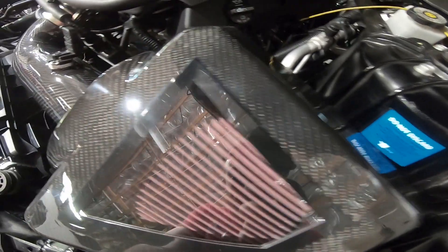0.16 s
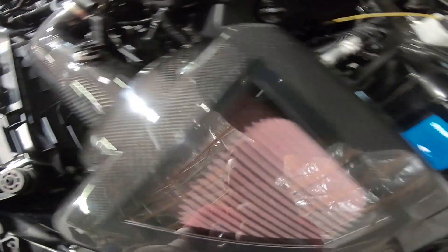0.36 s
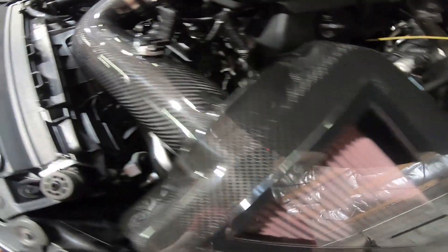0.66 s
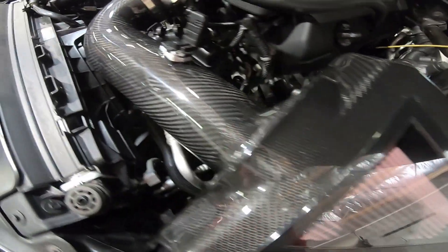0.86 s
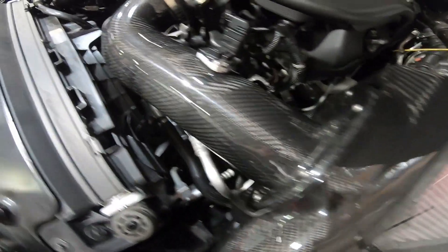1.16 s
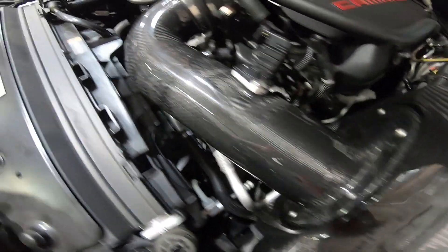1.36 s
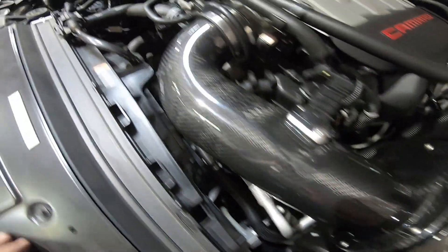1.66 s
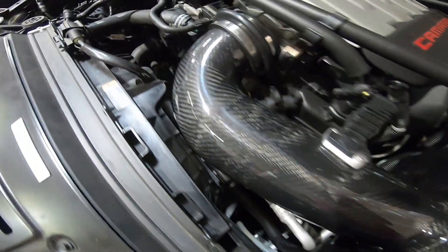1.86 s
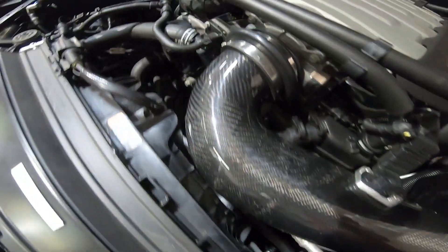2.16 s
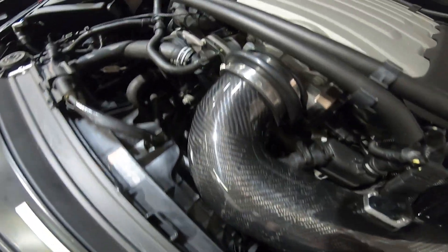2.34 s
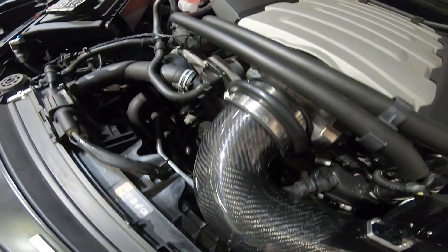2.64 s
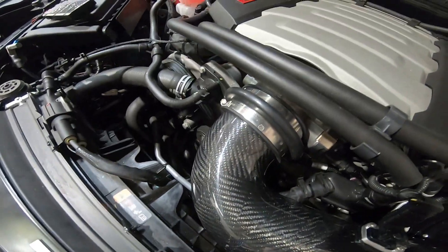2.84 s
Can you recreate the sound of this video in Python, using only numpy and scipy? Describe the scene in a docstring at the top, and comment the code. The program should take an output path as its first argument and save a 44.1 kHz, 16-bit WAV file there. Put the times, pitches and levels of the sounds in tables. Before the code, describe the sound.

A large V8 idles evenly in a garage, deep throbbing pulses over a low hum, with intake air rushing, belt whirr and rapid injector ticks, heard close as the microphone drifts from air filter towards the block.

```python
"""The throb of a big V8 idling at about 600 rpm in a garage, heard from just above the open engine bay.
Pulses at the firing rate make the beat, over a steady sine hum; noise shaped by resonances drones in the
block and rings in the intake. Bursts of noise are the injector ticks, and soft notes chirp once per engine cycle.
The microphone drifts from the rushing air filter towards the block and the whirring belt drive."""
import sys
import numpy as np
from scipy import signal
from scipy.fft import rfft, irfft
from scipy.io import wavfile
from scipy.ndimage import uniform_filter1d, minimum_filter1d

SR = 44100
rng = np.random.default_rng(int(sys.argv[2]) if len(sys.argv) > 2 else 0)


def log_audio(samples):
    """Write samples as a 16-bit WAV file to the path given in sys.argv[1]."""
    # one column per channel
    frames = np.atleast_2d(samples).T
    # limit to full scale, then quantise
    limited = np.clip(frames, -1, 1)
    pcm = np.round(limited * 32767).astype(np.int16)
    wavfile.write(sys.argv[1], SR, pcm)


N = 132300
T = np.arange(N) / SR
HZ = np.fft.rfftfreq(N, 1 / SR)
CYLINDERS = 8

# left-right likeness of belt drive and ticks: (frequency [Hz], likeness [0-1])
CLATTER_SAME = [(300, 0.47), (600, 1), (900, 0.55), (1300, 1), (3300, 0.52), (4200, 0.75), (5700, 0.28),
                (7000, 0.92), (15000, 1)]
# balance of belt drive, scaled for the ticks: (time [s], left minus right [dB])
CLATTER_PAN = [(0, 2), (1.2, 0.1), (2.3, -2.1), (3, -1.5)]


def amp(db):
    """Amplitude ratio from dB."""
    return 10 ** (np.asarray(db) / 20)


def unit(x):
    """Scales to an RMS of 1."""
    return x / np.sqrt(np.mean(x ** 2) + 1e-20)


def curve(points):
    """Breakpoints in time to one value per sample."""
    return np.interp(T, *np.transpose(points))


def spectrum(points):
    """Breakpoints in frequency to one value per bin, on a log axis."""
    f, value = np.transpose(points)
    return np.interp(np.log(HZ + 1), np.log(f + 1), value)


def wander(rate_hz):
    """Slow random drift of RMS 1: low-passed noise without its mean."""
    lowpass = np.exp(-(HZ / rate_hz) ** 2) * (HZ > 0)
    return unit(irfft(rfft(rng.standard_normal(N)) * lowpass, N))


def pan(left_db):
    """Left and right gains; left_db is left minus right."""
    return amp(np.array([[1], [-1]]) * left_db / 2)


def colour(pair, gain, same):
    """Filters two noises into a left-right pair of given likeness, RMS 1."""
    a, b = rfft(pair)
    same = np.clip(same, -1, 1)
    right = same * a + np.sqrt(1 - same ** 2) * b
    return unit(irfft(np.array([a, right]) * gain, N))


def churn(firings, repeat):
    """Two noises, of which a power share comes back alike in every engine cycle."""
    size = SR // 5
    place = (firings / CYLINDERS % 1 * size).astype(int) % size
    repeat = np.clip(repeat, 0, 1)
    alike = rng.standard_normal((2, size))[:, place]
    fresh = rng.standard_normal((2, N))
    return np.sqrt(repeat) * alike + np.sqrt(1 - repeat) * fresh


def resonances(modes):
    """Joint gain of resonant peaks, each halved in amplitude one width off centre."""
    return np.sqrt(sum((amp(db) / (1 + ((HZ - hz) / width) ** 2)) ** 2 for hz, width, db in modes))


def ripple(width_hz):
    """Random peaks and dips along the spectrum, from many small resonances and reflections."""
    knots = np.arange(0, SR, max(width_hz, 5))
    return np.interp(HZ, knots, rng.standard_normal(SR // 4)[:len(knots)])


def cycle_note(firings, hz, place_s, half_s, level):
    """A short soft note at the same point of each engine cycle, slightly varied in pitch and level."""
    out = np.zeros(N)
    cycles = int(firings[-1] / CYLINDERS)
    for k, (detune, stray_db) in enumerate(rng.standard_normal((cycles, 2))):
        age = T - np.interp(k * CYLINDERS, firings, T) - place_s
        swell = np.exp(-.5 * (age / half_s) ** 2)
        out += amp(stray_db) * swell * np.sin(2 * np.pi * (hz + 4 * detune) * age)
    return out * amp(curve(level))


def crank_rpm():
    """Idle speed, drifting by a few rpm."""
    # (time [s], speed [rpm])
    speed = [(0, 596), (.8, 598.8), (1.1, 601.6), (1.7, 601.5), (2, 600.3), (2.3, 604), (3, 604.6)]
    return curve(speed)


def beat(firings):
    """Leaning pressure pulses, one per firing, over the rumble of uneven combustion."""
    # harmonics of the pulse: (multiple of the firing rate, level [dB])
    orders = [(1, -1.5), (2, -8), (4, -42), (5, -28.5), (6, -40)]
    # pulses: (time [s], level [dB])
    pulse_level = [(0, -14), (.15, -15.5), (.45, -16.5), (1.05, -16.5), (1.4, -16.5), (1.9, -15.5),
                   (2.25, -16.5), (2.8, -17.5), (3, -15)]
    # uneven combustion: (frequency [Hz], density [dB per Hz])
    rumble_tone = [(8, 11), (24, 1.5), (45, 4.5), (65, 10), (95, 10), (135, 8.5), (170, -1), (300, -50.5)]
    lean_turns, rumble_db = .13, -29.5
    turns = firings + 0.0043 * wander(rate_hz=2.3)
    pulses = np.zeros(N)
    for k, db in orders:
        k = round(k)
        phase = 2 * np.pi * (k * turns + (k - 1) * lean_turns)
        pulses += amp(db + 0.71 * wander(rate_hz=2.7)) * np.cos(phase)
    rumble = colour(churn(firings, repeat=0.36), amp(spectrum(rumble_tone)), same=0.92)
    return (np.sqrt(2) * amp(curve(pulse_level)) * pulses + amp(rumble_db) * rumble) * pan(left_db=-1.1)


def hum():
    """A steady sine hum that does not follow the crank."""
    hum_hz, hum_db = 119.97, -26.5
    level = np.sqrt(2) * amp(hum_db + 0.2 * wander(rate_hz=3.2))
    return -level * np.cos(2 * np.pi * hum_hz * T) * pan(left_db=-0.7)


def block(firings):
    """Combustion shakes the low resonances of the block and its covers."""
    # (centre [Hz], width [Hz], level [dB])
    modes = [(207.4, 22.4, -0.5), (244.6, 27, -6), (296.8, 22.3, -4)]
    # (time [s], level [dB])
    drone_level = [(0, -36.5), (.7, -37.5), (1.1, -36.5), (1.35, -35.5), (1.65, -32.5), (1.9, -29.5),
                   (2.1, -32), (2.3, -29), (2.47, -32), (2.62, -26.5), (2.75, -35.5), (3, -32.5)]
    shake = churn(firings, repeat=0.46) * (1 + 0.23 * np.cos(2 * np.pi * (firings - .4)))
    return amp(curve(drone_level)) * colour(shake, resonances(modes), same=0.98) * pan(left_db=-2.5)


def intake(firings):
    """Air is gulped through the filter, to the right, and rings in the duct and the pipe."""
    # rush: (frequency [Hz], density [dB per Hz])
    rush_tone = [(150, 0.5), (300, -10.5), (370, -1), (430, 1.5), (530, -2), (620, 0), (760, 2),
                 (900, -5.5), (1200, -34), (3000, -55)]
    # rush: (time [s], level [dB])
    rush_level = [(0, -39), (.15, -40.5), (.45, -40.5), (.7, -39), (1.1, -40.5), (1.6, -39.5), (2.3, -38),
                  (3, -39.5)]
    # duct: (centre [Hz], width [Hz], level [dB])
    duct_modes = [(503, 53, -1), (614, 46, -1), (1360, 110, -17.5), (1708, 49, -12)]
    # duct, near the filter: (time [s], level [dB])
    duct_level = [(0, -40.5), (.15, -41.5), (.4, -40), (.55, -45.5), (.8, -52), (1.3, -53.5), (3, -61)]
    # pipe: (centre [Hz], width [Hz], level [dB])
    pipe_modes = [(301.5, 18, 1), (360, 28, -5), (431, 17, -6)]
    # pipe, as the microphone passes over it: (time [s], level [dB])
    pipe_level = [(0, -46), (.6, -40), (1.1, -38.5), (1.7, -44), (3, -45)]
    gulps = churn(firings, repeat=0.17) * (1 + 0.22 * np.cos(2 * np.pi * firings))
    rush = amp(curve(rush_level)) * colour(gulps, amp(spectrum(rush_tone)), same=0.79)
    # one surge per engine cycle
    surges = churn(firings, repeat=0.24) * (1 + .5 * np.cos(2 * np.pi * (firings / CYLINDERS - .8)))
    duct = amp(curve(duct_level)) * colour(surges, resonances(duct_modes), same=0.88)
    flow = churn(firings, repeat=0.2)
    pipe = amp(curve(pipe_level)) * colour(flow, resonances(pipe_modes), same=0.97)
    return (rush + duct) * pan(left_db=-8.5) + pipe * pan(left_db=-4.0)


def whirr(firings):
    """Belt and valve gear: a dense, slightly grainy clatter that swells a little with each firing."""
    # (frequency [Hz], density [dB per Hz])
    tone = [(200, -12), (600, 0), (900, 3), (1200, 1), (1550, -2.5), (1850, -.5), (2300, -3), (2700, -6.5),
            (3200, -7), (3800, -12), (4700, -14), (6300, -12), (7600, -13), (9000, -24), (11500, -32),
            (16000, -43)]
    # (time [s], level before 4 dB of gain [dB])
    level = [(0, -49), (.4, -48.5), (1.2, -46.5), (2.2, -45), (3, -44.5)]
    ripple_db = 1.5
    grain_db = 1.03 * wander(rate_hz=120)
    swell_db = 0.18 * np.cos(2 * np.pi * (firings - .75))
    drive = churn(firings, repeat=0.28) * amp(grain_db + swell_db)
    gain = amp(spectrum(tone) + ripple_db * ripple(width_hz=45))
    sound = colour(drive, gain, spectrum(CLATTER_SAME))
    return amp(curve(level) + 4) * sound * pan(curve(CLATTER_PAN))


def injectors(firings):
    """Each injector ticks open and shut in its own colour; the engine bay smears the ticks."""
    # in firing order: (delay after the firing beat [s], relative level [dB])
    valves = [(.0135, -4), (.0135, .5), (.013, -1.5), (.0135, -.7), (.0145, 0), (.0128, -.5), (.015, 1),
              (.0125, 0)]
    # (frequency [Hz], density [dB per Hz])
    tick_tone = [(1000, -10), (2000, -12), (3000, -31), (4200, -19), (5200, 6), (6400, 9.5), (7700, 7.5),
                 (8800, -5.5), (10000, -6), (11200, -17), (13200, -19), (16000, -29)]
    # (time [s], level [dB])
    tick_level = [(0, -54), (1.2, -54), (2.2, -52), (3, -54.5)]
    jitter_s, stray_db, tint_db = .0005, 1.0, 2.5
    decay_s, bay_decay_s, close_s = .004, .024, .0095
    # opening, closing, bay: (delay [s], level [dB], amplitude decay [s])
    parts = ((0, 0, decay_s), (close_s, -1, decay_s), (0, -3.5, bay_decay_s))
    power = np.zeros((CYLINDERS, N))
    for k, (late, stray) in enumerate(rng.standard_normal((int(firings[-1]) + 1, 2))):
        valve = k % CYLINDERS
        age = T - np.interp(k, firings, T) - valves[valve][0] - jitter_s * late
        for after, level_db, decay in parts:
            start = np.searchsorted(age, after)
            part = slice(start, start + SR // 10)
            burst = np.exp(-2 * (age[part] - after) / decay)
            power[valve, part] += amp(level_db + stray_db * stray) ** 2 * burst
    tone, same = spectrum(tick_tone), spectrum(CLATTER_SAME)
    ticks = np.zeros((2, N))
    for own, (_, db) in zip(power, valves):
        noise = np.sqrt(own) * rng.standard_normal((2, N))
        ticks += amp(db) * colour(noise, amp(tone + tint_db * ripple(width_hz=468)), same)
    return amp(curve(tick_level)) * unit(ticks) * pan(0.48 * curve(CLATTER_PAN) + .3)


def hoot(firings):
    """A lower soft note, far right, once per engine cycle; it fades away after the first second."""
    # (time [s], level [dB])
    hoot_level = [(0, -33), (.2, -38), (.4, -38), (.6, -38), (.8, -39), (1.1, -80), (3, -61)]
    return cycle_note(firings, hz=660, place_s=-.001, half_s=.014, level=hoot_level) * pan(left_db=-15)


def chirp(firings):
    """A higher soft note, to the right, once per engine cycle."""
    # (time [s], level [dB])
    chirp_level = [(0, -54), (.2, -41), (.45, -34), (1, -34.5), (2, -31), (2.4, -35), (2.6, -44),
                   (2.85, -33.5), (3, -31)]
    return cycle_note(firings, hz=785, place_s=.032, half_s=.010, level=chirp_level) * pan(left_db=-6)


def whines(rpm):
    """Thin, wavering tones of belt-driven accessories, in step with crank speed."""
    # (frequency at mean speed [Hz], level [dB])
    tones = [(1025, -59.5), (1792, -65), (2934, -64), (6428, -87)]
    waver_db = 2.5
    out = np.zeros(N)
    for hz, db in tones:
        level = np.sqrt(2) * amp(db + waver_db * wander(rate_hz=12))
        pitch_hz = hz * rpm / rpm.mean() * (1 + 0.00336 * wander(rate_hz=16.2))
        out += level * np.sin(2 * np.pi * np.cumsum(pitch_hz) / SR)
    return out


def scene():
    """Sums all sources, timed by the running count of firings."""
    rpm = crank_rpm()
    # each cylinder fires once in two turns
    firings = np.cumsum(rpm / 60 * CYLINDERS / 2) / SR
    engine = beat(firings) + hum() + block(firings) + intake(firings)
    clatter = whirr(firings) + injectors(firings)
    return engine + clatter + hoot(firings) + chirp(firings) + whines(rpm)


def record(dry):
    """Two microphone ports hear the midrange out of step; a limiter evens the pulse tops; then the band limit."""
    # phase by which the left port leads: (frequency [Hz], lead [rad])
    port_lead = [(20, 0.044), (520, 0), (680, 1.62), (1050, 1.54), (1500, 1.02), (2100, 1.17), (2600, 0.86),
                 (3200, 0), (4000, 0), (6500, 0.078)]
    limit_db, hold_s, cutoff_hz = -8, 0.012, 15750
    lead = np.interp(np.fft.rfftfreq(2 * N, 1 / SR), HZ, spectrum(port_lead))
    turn = np.exp(1j * np.array([[.5], [-.5]]) * lead)
    ports = irfft(rfft(dry, 2 * N) * turn)[:, :N]
    hold = max(int(hold_s * SR), 1)
    room = np.minimum(amp(limit_db) / (abs(ports).max(0) + 1e-9), 1)
    limited = ports * uniform_filter1d(minimum_filter1d(room, hold), hold)
    lowpass = signal.firwin(511, cutoff_hz, window=("kaiser", 9), fs=SR)
    return signal.oaconvolve(limited, lowpass[None], "same")


dry = scene()
out = record(dry)
log_audio(out)
```